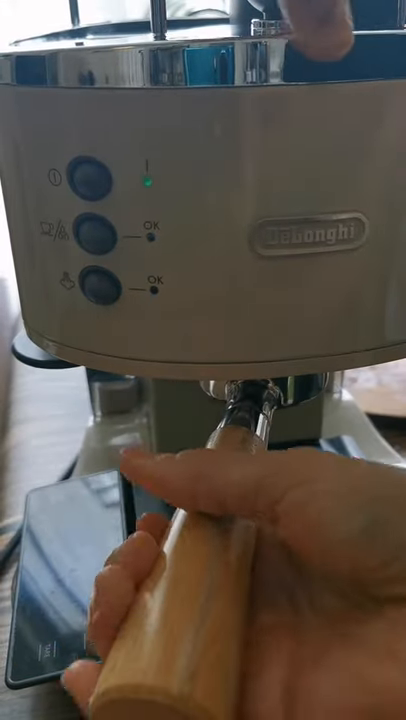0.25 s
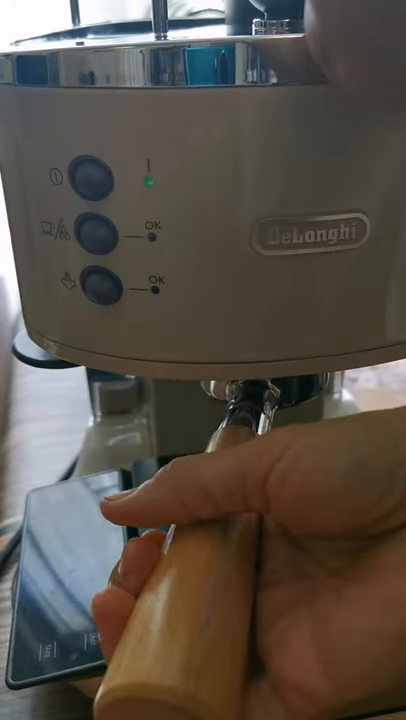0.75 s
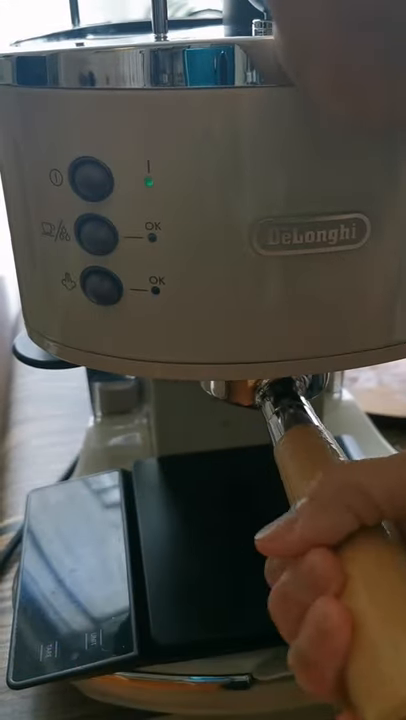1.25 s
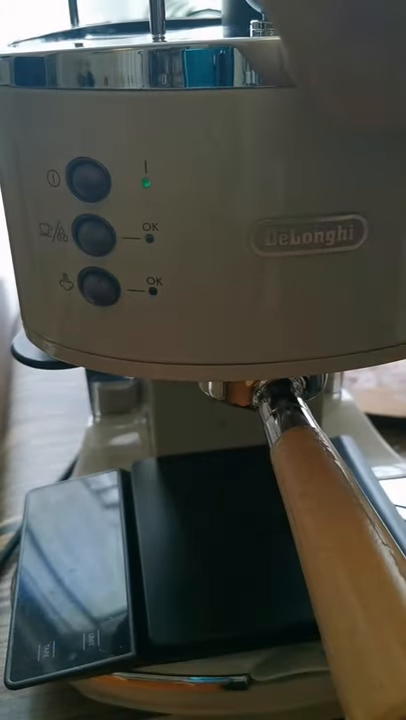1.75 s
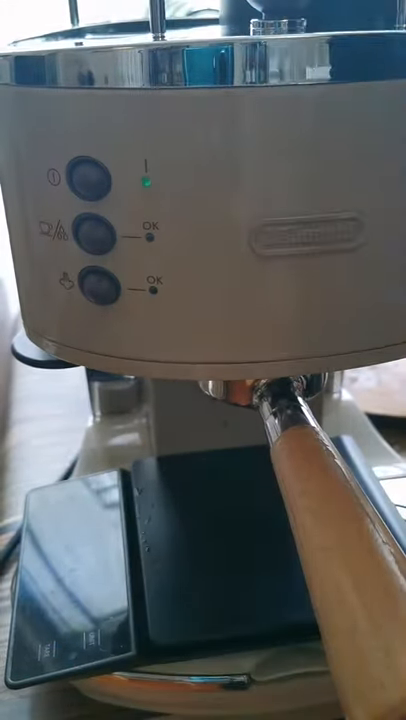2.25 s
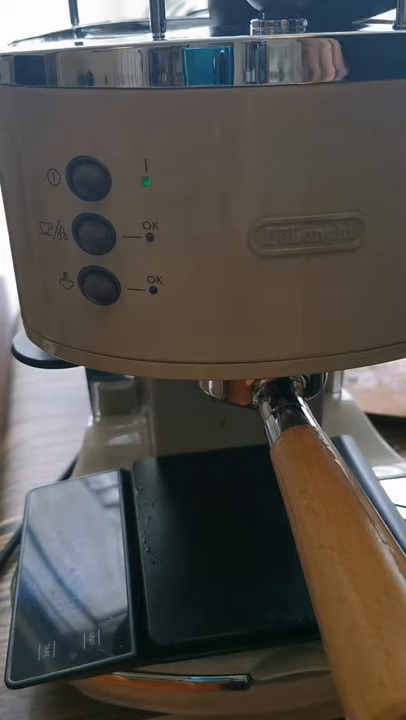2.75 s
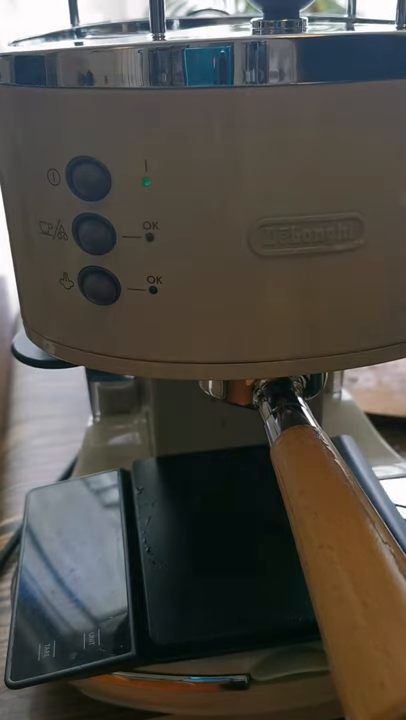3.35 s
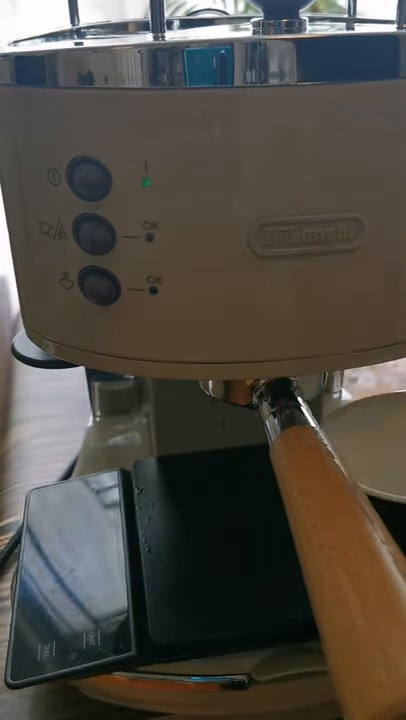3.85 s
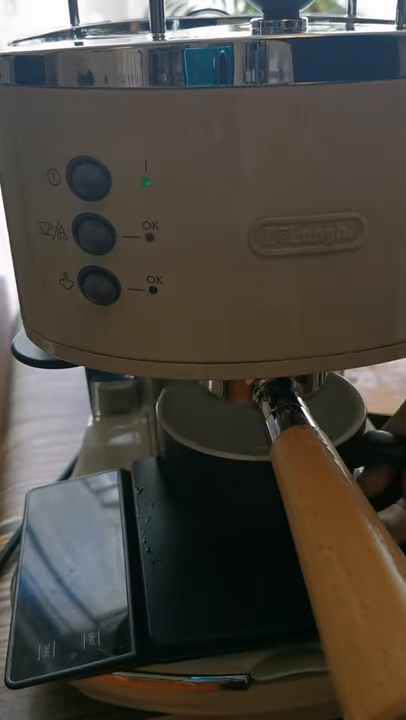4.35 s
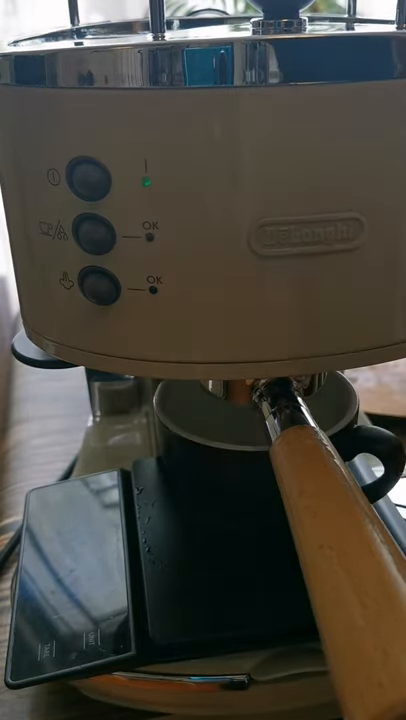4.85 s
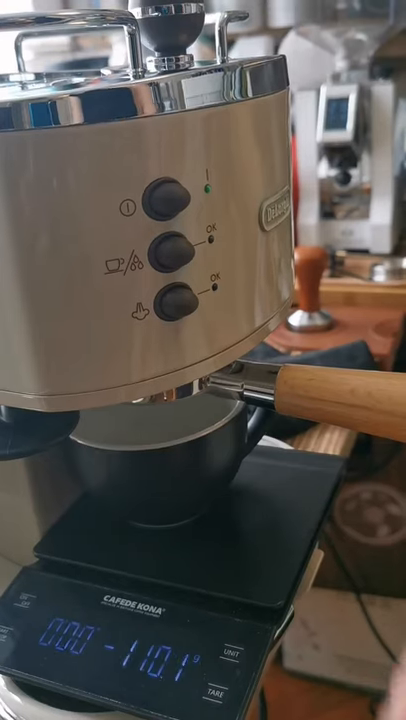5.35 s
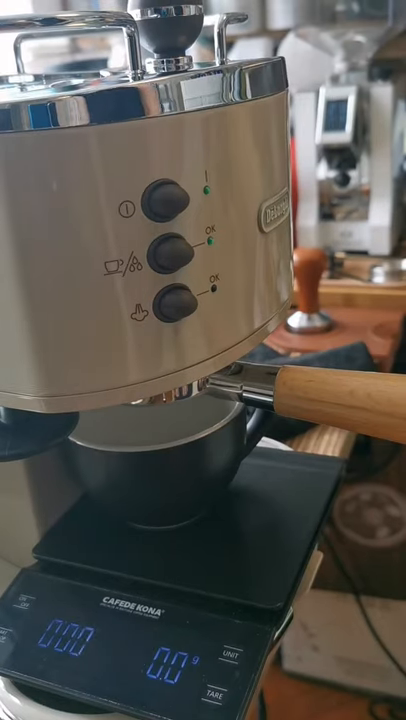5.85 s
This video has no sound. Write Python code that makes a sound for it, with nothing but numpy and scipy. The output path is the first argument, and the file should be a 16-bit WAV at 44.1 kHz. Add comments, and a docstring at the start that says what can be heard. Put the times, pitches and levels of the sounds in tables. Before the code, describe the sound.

A quiet, lightly reverberant kitchen heard close up, with a steady low electrical and motor hum and soft, mostly low room noise for about six seconds. From 0.2 to 1.7 s, faint airy skin brushes and tiny metal ticks surround a handle, which seats with a weak short clunk at 0.94. Near 2.1 and 2.3 the sound briefly dips. At 2.76-2.88 a rapid cluster of soft, dull pats strikes the casing. A crisp small cup clink comes at 3.91. From 4.09 to 4.65 the cup scrapes grittily over a plate, catching in little knocks as its hiss brightens. It lands at 4.65 with a loud, hard, woody-metallic knock, rocking in fading taps until 4.75, its deep ring quickly stopped. A tiny tick follows at 4.87. The background almost vanishes briefly at 5.17 and 5.48; a small bright click sounds at 5.76, then faint brushing.

```python
"""Espresso machine and cup

A hand twists a portafilter into place, skin brushing the handle, and pats the casing; small metal ticks.
A cup clinks on the spout, slides over a kitchen scale and rocks to rest; later something small clicks.
Blows are sums of decaying modes plus a noise crack; friction is shaped noise or clicks through resonances.
Compressor and mains tones drone over room noise, a diffuse tail follows the sounds, and the level
drops out briefly four times."""
import sys
import numpy as np
from scipy import signal
from scipy.fft import rfft, irfft
from scipy.io import wavfile
from scipy.ndimage import uniform_filter1d

SR = 44100
rng = np.random.default_rng(int(sys.argv[2]) if len(sys.argv) > 2 else 0)


def unload_wav(signal):
    """Save mono or channel-first audio to the path in sys.argv[1] as 16-bit WAV at rate SR, clipped to [-1, 1]."""
    wavfile.write(
        sys.argv[1],
        SR,
        np.round(np.clip(np.atleast_2d(signal).T, -1, 1) * 32767).astype(np.int16),
    )


N = 269010

# Compressor and mains tones: pitch_hz, starting level_db (before wander and pan)
HUM_TONES = [(32.3, -71), (97, -68), (101, -57.5), (145.3, -58), (193.8, -54), (242.2, -57), (387.6, -65.5),
             (436, -60.5), (629.8, -68.5), (726.7, -67), (775.2, -83.5), (823.6, -69), (915.2, -71.5)]
# Room noise spectrum: frequency_hz, relative density_db
ROOM_SPECTRUM = [(12, -26), (20, -5), (198, -5.5), (255, -7.5), (293, -14.5), (434, -9.5), (513, -15),
                 (718, -11), (1060, -19), (2320, -28.5), (3530, -36.5), (6010, -36.5), (7950, -40),
                 (10800, -42.5), (16000, -52)]
# Faint narrow hisses: centre_hz, width_hz, mean level_db, flicker_db
NARROW_HISSES = [(5960, 110, -83.5, 3), (2500, 730, -75, 2)]
# Left-right correlation of diffuse noise: frequency_hz, correlation (0 to 1)
CORRELATION = [(25, 1), (60, 0.87), (250, 0.83), (1000, 0.073), (4000, 0.22), (12000, 0.76)]
# Bright treble swells, mostly skin brushing the handle; those at 2.86 s and 5.8 s trail the pats and the late
# click: peak_s, rise_s, fall_s, level_db (before high-pass), low_cut_hz
TREBLE_SWELLS = [(.255, .02, 0.015, -52, 7050), (.43, 0.04, .08, -64.5, 5000),
                 (.778, .003, 0.022, -58.5, 4000), (1.264, .006, 0.025, -48, 4300),
                 (1.32, 0.02, 0.021, -60, 5000), (1.695, 0.022, 0.0094, -44, 8000),
                 (2.21, 0.068, 0.03, -58, 5000), (2.86, .033, 0.034, -50.5, 1500),
                 (5.8, .025, 0.059, -50.5, 8000), (6.09, 0.19, .03, -62.5, 4000)]
# Treble friction noise spectrum: frequency_hz, relative density_db
TREBLE_SPECTRUM = [(1000, 14), (4000, 0.5), (6500, -2.5), (8000, -3.5), (10500, 0.5), (12500, -6.5),
                   (15000, -8)]
# Small metal ticks: start_s, peak_db (before pan), pitch_hz
METAL_TICKS = [(.272, -54, 2440), (.415, -58, 11000), (.44, -55, 4600), (.482, -53, 10800),
               (.771, -51.5, 5000), (.93, -51, 3080), (1.262, -53, 10000), (2.174, -56, 2650),
               (4.873, -50, 10600)]
# Blows as the handle seats: start_s, level_db, crack_over_ring_db
LOCK_BLOWS = [(.931, -49.5, -15), (.94, -44, -13), (.957, -64, -7.5)]
# Modes of the handle: pitch_hz, level_db, t60_s
HANDLE_MODES = [(265, 4, 0.076), (390, -2, 0.13), (580, 2, 0.043), (644, 2, 0.052), (870, 4, 0.016),
                (1110, -7, 0.033), (1444, -10, 0.09), (1900, -8, .015)]
# Soft blows on the casing: start_s, level_db, crack_over_ring_db
PAT_BLOWS = [(2.756, -49, -23), (2.778, -42.5, -4), (2.79, -41.5, -6), (2.829, -36, 0), (2.833, -25, -9.5),
             (2.838, -35.5, 7.5), (2.846, -39, -12), (2.857, -34, -7), (2.866, -30, -8.5), (2.88, -38, -3)]
# Modes of the casing: pitch_hz, level_db, t60_s
CASING_MODES = [(150, -10, 0.061), (210, -2, 0.064), (249, -0.5, 0.038), (310, -1.5, 0.073),
                (390, -5, 0.11), (464, -5, 0.068), (595, -9, 0.093), (703, -4.5, 0.033), (980, -4, 0.018),
                (1170, -4, 0.019), (1386, -3.5, 0.019), (2420, -2, 0.01)]
# A faint high hiss passes: middle_s, half_length_s, centre_hz, width_hz, level_db (before envelope)
PASSING_HISS = (3.07, .065, 7250, 250, -75)
# Cup on spout: start_s, level_db, crack_over_ring_db
CLINK_BLOWS = [(3.911, -32.5, 5.5), (3.9135, -37.5, 5.5)]
# Modes of the cup: pitch_hz, level_db, t60_s
CUP_MODES = [(423, 3.5, 0.017), (805, 2, 0.042), (1025, 2, 0.07), (1430, 2.5, 0.053), (1900, -2.5, 0.021),
             (2240, 2, 0.046), (2650, -5.5, 0.037), (3000, -10, 0.12), (3080, 0, 0.14), (3500, -2, .02),
             (4730, -8, .015), (7300, -15, .012), (9450, -23, .015)]
# The cup dragged over the plate: time_s, boom_db, grit_db, fine_hiss_db (before surges and pan),
# lower_ring_hz, upper_ring_hz
SLIDE_PATH = [(4.084, -78, -67, -75, 2090, 2490), (4.099, -46, -58, -68, 2020, 2550),
              (4.13, -49.5, -56, -61, 1900, 2870), (4.2, -43.5, -53.5, -58, 2030, 2870),
              (4.26, -48.5, -56.5, -54, 2150, 2650), (4.315, -42.5, -54, -54, 2520, 3200),
              (4.39, -48, -57, -55, 2060, 3430), (4.484, -52, -50.5, -50, 2150, 3500),
              (4.64, -53, -56.5, -57.5, 1900, 2460)]
# Fixed resonances of the drag: centre_hz, width_hz, relative level_db
DRAG_RESONANCES = [(203, 21, -6), (590, 320, 1.5), (767, 180, 9), (905, 370, -2.5), (1633, 82, 1),
                   (1836, 82, 0.5), (2180, 98, 2), (2550, 130, -1), (2870, 76, 0.5), (3150, 330, -3)]
# Treble rings of cup and plate: centre_hz, width_hz, relative level_db
TREBLE_RINGS = [(4300, 400, 0.5), (4750, 160, 0.5), (5200, 210, 3.5), (5940, 300, 1.5), (6600, 470, 3.5),
                (7400, 420, 4), (8400, 580, 1), (9100, 610, -0.5), (10400, 820, 0), (11600, 1500, -4),
                (14200, 2300, -19)]
# The dragged cup foot catches: start_s, level_db, crack_over_ring_db
CATCH_BLOWS = [(4.092, -45.5, -5.5), (4.137, -41.5, -6.5), (4.171, -47, -12), (4.201, -33.5, -9),
               (4.23, -39.5, -9.5), (4.276, -58, -5.5), (4.331, -40, -6)]
# The cup lands and rocks: start_s, level_db, crack_over_ring_db
LANDING_BLOWS = [(4.654, -11, -10), (4.66, -23, -4.5), (4.688, -18, -9.5), (4.696, -33, 4),
                 (4.717, -26.5, -10.5), (4.735, -40.5, 1.5), (4.756, -55, 10)]
# Modes of the plate: pitch_hz, level_db, t60_s
PLATE_MODES = [(620, 6, 0.0068), (873, 2.5, 0.048), (977, -5, 0.035), (1017, -3, 0.029), (1243, -18, 0.058),
               (1860, -4, 0.021), (1930, -5.5, 0.023), (2150, -3, 0.011), (3025, -8.5, 0.015),
               (3850, -21.5, 0.052), (4630, -16.5, 0.023), (6880, -18, 0.021), (8500, -23, 0.014)]
# Deep modes of the scale: pitch_hz, level_db, t60_s (before choking)
SCALE_MODES = [(200, -16, .08), (335, -10, .1), (381, 0, .3), (500, -12, .06), (643, -6, .2)]
# Late click: start_s, level_db, crack_over_ring_db
CLICK_BLOWS = [(5.758, -41.5, -2), (5.762, -38, 1), (5.767, -54, -2)]
# Modes of the small clicking part: pitch_hz, level_db, t60_s
CLICK_MODES = [(3160, -3.5, 0.014), (3900, -11, .02), (4760, -9, 0.026), (4860, -1, 0.023),
               (5200, -4, 0.022), (8640, -6, .02), (10600, -5, 0.019)]
# Colour of the room's tail: frequency_hz, relative density_db
WALL_SPECTRUM = [(60, -24), (200, -1.5), (900, -1), (1900, -0.5), (3000, 0.5), (5000, -1.5), (16000, -6)]
# Treble resonances added to the flat response: centre_hz, width_hz, gain_db
MICROPHONE_PEAKS = [(6700, 760, -14.5), (9040, 160, -3), (10700, 120, -5)]
# Brief dropouts: start_s, end_s, depth_db, lasting step_db of hum under 300 Hz, step_db of higher tones
LEVEL_DROPOUTS = [(2.092, 2.113, -14, -0.5, 2), (2.279, 2.303, -28, -0.4, -1),
                  (5.165, 5.201, -38, -2.03, -2.26), (5.481, 5.52, -43, 1, 0)]

ROOM_NOISE_DB = -51.5
SWELL_PAN_DB, TICK_PAN_DB = -4.5, -2   # pans are left minus right
SURGE_DB, SURGE_S = 3.5, .02   # each catch lifts the scrape, which then settles
BOOM_HZ, BOOM_SAG_HZ_PER_S = 712, 97   # as the cup travels the boom sinks
DULL_START_DB, BRIGHTEN_S = -6, .12   # the top of the hiss opens up as the cup gathers speed
WEIGHT_LAG_S, WEIGHT_DB = .002, -16   # the cup's weight comes down just after the first touch
SETTLE_S, SETTLE_DB_PER_S = 4.72, 500   # once the cup sits flat it chokes the scale's deep ring
KITCHEN_T60_S, KITCHEN_DB = 0.24, -2.5
DUCK_FROM_DB, DUCK_SHARE, RELEASE_DB_PER_S = -30.5, 0.19, 53   # release of the held level, not of the gain
CUTOFF_HZ = 16500


def amp(db):
    """Decibel law: level to amplitude ratio."""
    return 10 ** (np.asarray(db, float) / 20)


def rms_one(x):
    """Power normalisation: scale to unit rms."""
    return x / np.sqrt(np.mean(x ** 2) + 1e-20)


def at_hz(points, hz):
    """Log-frequency interpolation of a spectrum table."""
    table = np.array(points)
    return np.interp(np.log(hz), np.log(table[:, 0]), table[:, 1])


def sides(pan_db):
    """Level-difference panning: gains of left and right."""
    return amp(np.multiply.outer([.5, -.5], pan_db))


def drift(rate_hz):
    """Low-passed random process: a slow wander of rms 1."""
    step = 40   # samples between points of the slow curve
    r = np.exp(-2 * np.pi * rate_hz * step / SR)
    warm_up = 2000
    noise = rng.standard_normal(N // step + 2 + warm_up)
    slow = signal.lfilter([1], [1, -2 * r, r * r], noise)[warm_up:]
    return np.interp(np.arange(N) / step, np.arange(len(slow)), rms_one(slow))


def resonance(x, hz, width):
    """Two-pole resonator with peak gain near 1."""
    r = np.exp(-np.pi * width / SR)
    zeros = np.array([1, 0, -1]) * (1 - r * r) / 2
    return signal.lfilter(zeros, [1, -2 * r * np.cos(2 * np.pi * hz / SR), r * r], x)


def coloured(spectrum):
    """Spectral shaping of mid-side noise, with left-right correlation set by frequency; rms 1."""
    hz = np.maximum(np.fft.rfftfreq(N, 1 / SR), 1)
    mid, side = rfft(rng.standard_normal((2, N))) * amp(at_hz(spectrum, hz))
    alike = np.clip(at_hz(CORRELATION, hz), 0, 1)
    stereo = np.sqrt(1 + alike) * mid + np.sqrt(1 - alike) * side * [[1], [-1]]
    return rms_one(irfft(stereo, N))


def band_noise(hz, width):
    """Resonant filtering: independent left and right noise in one band; rms 1."""
    return rms_one(resonance(rng.standard_normal((2, N)), hz, width))


def strike(hits, modes, pan_db, contact_s, crack_s, low_hz, high_hz):
    """Modal impact: each blow rings decaying modes that build up over the contact, plus a noise crack."""
    out = np.zeros((2, N))
    hz, level_db, t60 = np.array(modes).T[:, :, None]
    t = np.arange(SR // 3) / SR
    polarity = (-1.) ** np.arange(len(hz))[:, None]
    rings = amp(level_db - 60 * t / t60) * np.sin(2 * np.pi * hz * t) * polarity
    band = np.vstack([signal.butter(1, low_hz, "high", fs=SR, output="sos"),
                      signal.butter(2, high_hz, fs=SR, output="sos")])
    for start_s, db, crack_db in hits:
        uneven = amp(rng.normal(0, 1, hz.shape))   # mode balance varies by about 1 dB
        body = (rings * uneven).sum(axis=0) * (1 - np.exp(-t / contact_s))
        noise = rng.standard_normal(len(t)) + 0.69 * rng.standard_normal((2, len(t)))
        crack = signal.sosfilt(band, np.exp(-t / crack_s) * noise)
        blow = sides(pan_db)[:, None] * amp(db) * (body + amp(crack_db) * crack)
        at = round(start_s * SR)
        out[:, at:at + len(t)] += blow[:, :N - at]
    return out


def hum():
    """Additive synthesis: wavering tones whose levels step after each dropout."""
    t = np.arange(N) / SR
    low_db, high_db = np.zeros((2, N))
    for _, end, _, low_step_db, high_step_db in LEVEL_DROPOUTS:
        low_db += low_step_db * (t > end)
        high_db += high_step_db * (t > end)
    wobble_s = 0.00031 * drift(1.42)   # the motor runs a little unevenly, all tones together
    tones = np.zeros(N)
    for hz, db in HUM_TONES:
        level_db = db + (low_db if hz < 300 else high_db) + drift(5.4)
        phase = 2 * np.pi * (hz * (t + wobble_s) + rng.random())
        tones += np.sqrt(2) * amp(level_db) * np.sin(phase)
    return np.outer(sides(0.43), tones)


def room_noise():
    """Diffuse broadband noise with a wandering level."""
    return amp(ROOM_NOISE_DB + 0.68 * drift(4.2)) * coloured(ROOM_SPECTRUM)


def narrow_hisses():
    """Band-limited noise: faint hisses that flicker independently."""
    return sum(amp(db + flicker_db * drift(8.3)) * band_noise(hz, width)
               for hz, width, db, flicker_db in NARROW_HISSES)


def treble_swells():
    """Friction noise: bright swells with unequal Gaussian rise and fall."""
    t, noise, out = np.arange(N) / SR, coloured(TREBLE_SPECTRUM), np.zeros((2, N))
    for peak_s, rise, fall, db, low_hz in TREBLE_SWELLS:
        swell = np.exp(-.5 * ((t - peak_s) / np.where(t < peak_s, rise, fall)) ** 2)
        high_pass = signal.butter(2, low_hz, "high", fs=SR, output="sos")
        out += amp(db) * sides(SWELL_PAN_DB)[:, None] * swell * signal.sosfilt(high_pass, noise)
    return out


def ticks():
    """Damped noise excitation: tiny contacts in a band half as wide as its pitch."""
    out, t = np.zeros((2, N)), np.arange(SR // 20) / SR
    for start_s, peak_db, hz in METAL_TICKS:
        contact = rng.standard_normal(len(t)) * np.exp(-t / 0.0036)
        burst = resonance(contact, hz, .5 * hz)
        at = round(start_s * SR)
        out[:, at:at + len(t)] += np.outer(sides(TICK_PAN_DB), amp(peak_db) * burst / np.abs(burst).max())
    return out


def lock():
    """Modal impact: the handle rings as it seats."""
    return strike(LOCK_BLOWS, HANDLE_MODES, pan_db=-3, contact_s=0.00063, crack_s=0.0051,
                  low_hz=1500, high_hz=8000)


def pats():
    """Soft impact: a longer contact makes the casing modes build up gently."""
    return strike(PAT_BLOWS, CASING_MODES, pan_db=1.5, contact_s=0.0026, crack_s=0.0068,
                  low_hz=900, high_hz=3900)


def passing_hiss():
    """Enveloped band noise: a faint high hiss swells and fades."""
    mid_s, half_s, hz, width, db = PASSING_HISS
    envelope = np.exp(-((np.arange(N) / SR - mid_s) / half_s) ** 4)
    return amp(db) * envelope * band_noise(hz, width)


def clink():
    """Hard impact: a very short contact rings the cup against the spout."""
    return strike(CLINK_BLOWS, CUP_MODES, pan_db=-3.0, contact_s=.0002, crack_s=0.0019,
                  low_hz=590, high_hz=10000)


def gliding(x, hz, width):
    """Heterodyne filtering: shift the moving centre down to zero, smooth, shift back."""
    turn = np.exp(2j * np.pi * np.cumsum(hz) / SR)
    r = np.exp(-np.pi * width / SR)
    return (turn * signal.lfilter([1 - r], [1, -r], x / turn)).real


def grit(per_s):
    """Random impulse process: clicks of uneven size, their strength swelling in clumps."""
    sizes = amp(2.5 * np.minimum(rng.exponential(1, N), 4)) * rng.choice([-1, 1], N)
    return (rng.random(N) < per_s / SR) * sizes * amp(3.1 * drift(21.0))


def stereo_grit(per_s):
    """Mid-side impulses: a shared train plus a weaker one of opposite sign in each ear."""
    return grit(per_s) + .5 * grit(per_s) * [[1], [-1]]


def gliding_ring(grains, hz, width, outer_width):
    """Cascaded moving resonance: two gliding filters in series; rms 1."""
    return rms_one(gliding(gliding(grains, hz, width), hz, outer_width))


def fixed_rings(grains, upper):
    """Parallel resonators: the drag's fixed bands above or below 1300 Hz; rms 1."""
    total = np.zeros((2, N))
    for k, (hz, width, db) in enumerate(DRAG_RESONANCES):
        if (hz > 1300) == upper:
            ring = resonance(resonance(grains, hz, width), hz, 3 * width)
            total += (-1) ** k * amp(db) * rms_one(ring)
    return rms_one(total)


def slide():
    """Stick-slip friction: grit under the cup foot excites fixed and gliding resonances, hiss on top."""
    path_s, boom_db, grit_db, fine_db, lower, upper = np.transpose(SLIDE_PATH)
    t = np.arange(N) / SR
    surge_db = sum(SURGE_DB * (t > at) * np.exp(-np.abs(t - at) / SURGE_S) for at, *_ in CATCH_BLOWS)
    moving = (t > path_s[0]) & (t < LANDING_BLOWS[0][0])   # the landing ends it
    boom, scrape, fine = (moving * amp(np.interp(t, path_s, db) + surge_db)
                          for db in (boom_db, grit_db, fine_db))
    lower_hz, upper_hz = (np.interp(t, path_s, hz) for hz in (lower, upper))
    travelled_s = np.clip(t, path_s[0], path_s[-1]) - path_s[0]
    boom_hz = BOOM_HZ - BOOM_SAG_HZ_PER_S * travelled_s

    grains = stereo_grit(2500)
    low = fixed_rings(grains, upper=False) + gliding_ring(grains, boom_hz, 114, 190)
    middle = fixed_rings(grains, upper=True) + gliding_ring(grains, lower_hz, 91, 300)
    middle += amp(-6.0) * gliding_ring(grains, upper_hz, 150, 350)

    rub = coloured(TREBLE_SPECTRUM) + 0.3 * rms_one(stereo_grit(600))
    dull_db = DULL_START_DB * np.exp(-travelled_s / BRIGHTEN_S)
    hiss = np.zeros((2, N))
    for hz, width, db in TREBLE_RINGS:
        level_db = db + dull_db * (hz > 8000) + 2.7 * drift(13.6)   # each ring comes and goes alone
        hiss += amp(level_db) * rms_one(resonance(rub, hz, width))
    hiss /= np.sqrt(np.mean(hiss[:, moving] ** 2))
    return (boom * sides(-2.4)[:, None] * low + scrape * sides(-0.98)[:, None] * middle
            + fine * sides(-3.5)[:, None] * hiss)


def catches():
    """Modal impact: the caught foot rings the drag resonances, wide ones dying fastest."""
    modes = [(hz, db - 6 * (hz > 1300), 2.8 / width) for hz, width, db in DRAG_RESONANCES]
    return strike(CATCH_BLOWS, modes, pan_db=-3.0, contact_s=0.00033, crack_s=0.012,
                  low_hz=1500, high_hz=8000)


def landing():
    """Repeated impact: the cup lands and rocks, ringing the plate."""
    return strike(LANDING_BLOWS, PLATE_MODES, pan_db=-2.5, contact_s=0.00074, crack_s=0.0039,
                  low_hz=1500, high_hz=11000)


def weight():
    """Loaded impact: the cup's weight rings the scale deeply until the settled cup chokes it."""
    blow = (LANDING_BLOWS[0][0] + WEIGHT_LAG_S, WEIGHT_DB, -8)
    ring = strike([blow], SCALE_MODES, pan_db=-4.0, contact_s=0.011, crack_s=0.012,
                  low_hz=300, high_hz=3000)
    return ring * amp(-SETTLE_DB_PER_S * np.maximum(np.arange(N) / SR - SETTLE_S, 0))


def late_click():
    """Hard impact: a small part clicks with short high modes."""
    return strike(CLICK_BLOWS, CLICK_MODES, pan_db=-2.0, contact_s=.0003, crack_s=0.0041,
                  low_hz=3000, high_hz=14900)


def kitchen(x):
    """Diffuse reverberation: convolution with decaying noise that builds up from the first wall."""
    t = np.arange(SR // 2) / SR
    tail = coloured(WALL_SPECTRUM)[:, :len(t)]
    tail = tail * amp(-60 * t / KITCHEN_T60_S) * np.clip(t / 0.0016, 0, 1)
    tail = tail / np.sqrt((tail ** 2).sum(axis=1, keepdims=True))   # unit energy on each side
    return amp(KITCHEN_DB) * signal.fftconvolve(x, tail, axes=1)[:, :N]


def scene():
    """Superposition: direct sounds, their room tail and the background add."""
    background = hum() + room_noise() + narrow_hisses() + passing_hiss()
    plain = treble_swells() + ticks() + lock() + pats() + clink() + late_click()
    dragged, caught, landed, deep = slide(), catches(), landing(), weight()
    # send levels to the room: the scale's deep ring wakes less of it
    wet = plain + amp(-7.0) * dragged + amp(4.5) * caught + amp(-1.5) * landed + amp(-8) * deep
    return plain + dragged + caught + landed + deep + kitchen(wet) + background


def record(dry):
    """Transducer and level control: treble peaks, ducking after loud blows and a top cut; the sound also drops
    out briefly."""
    t = np.arange(N) / SR
    dry = dry + sum(amp(db) * resonance(dry, hz, width) for hz, width, db in MICROPHONE_PEAKS)
    power = uniform_filter1d((dry ** 2).mean(axis=0), size=441)   # 10 ms mean
    level_db = 10 * np.log10(power + 1e-12)
    release_db = RELEASE_DB_PER_S * t
    held_db = np.maximum.accumulate(level_db + release_db) - release_db   # peak hold, steady fall
    gain_db = uniform_filter1d(-DUCK_SHARE * np.maximum(held_db - DUCK_FROM_DB, 0), size=221)
    for start, end, depth_db, *_ in LEVEL_DROPOUTS:
        gain_db = gain_db + depth_db * np.clip(np.minimum((t - start) / 0.0037, (end - t) / 0.01), 0, 1)
    # faint hiss that outlasts the dropouts
    floor = amp(-74) * coloured([(100, 4), (2000, -5), (6000, -16), (16000, -24)])
    top_cut = signal.cheby2(12, 60, CUTOFF_HZ, fs=SR, output="sos")
    return signal.sosfilt(top_cut, dry * amp(gain_db) + floor)


dry = scene()
out = record(dry)
unload_wav(out)
```